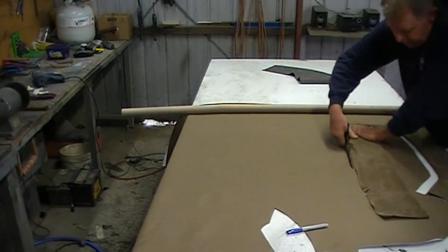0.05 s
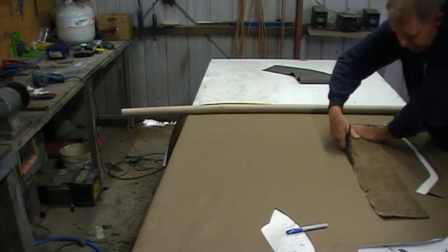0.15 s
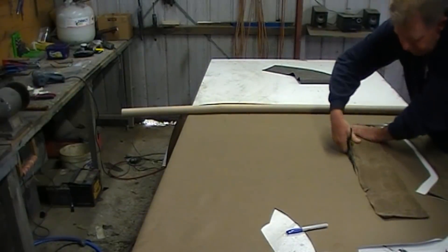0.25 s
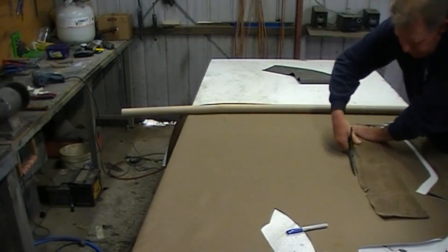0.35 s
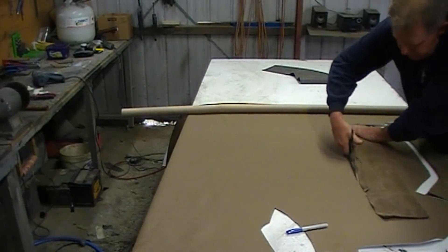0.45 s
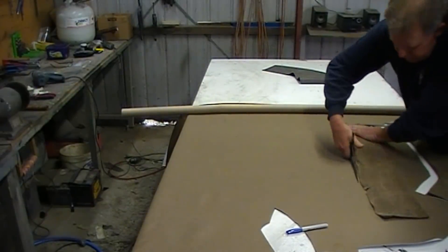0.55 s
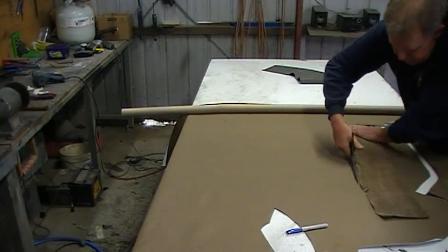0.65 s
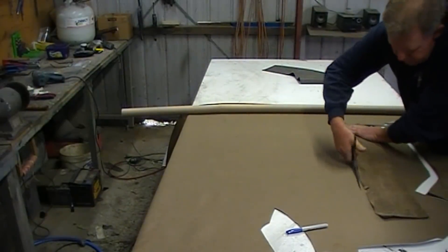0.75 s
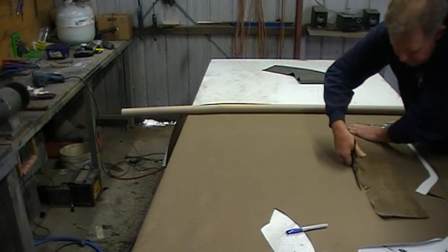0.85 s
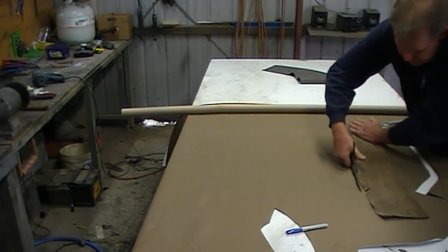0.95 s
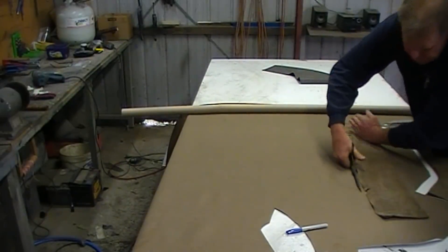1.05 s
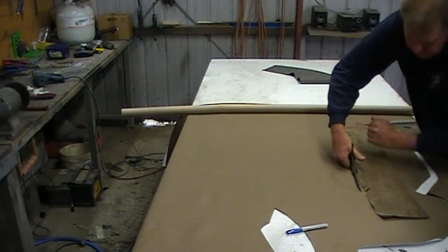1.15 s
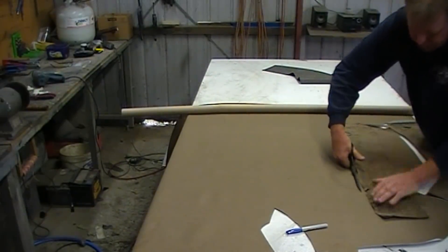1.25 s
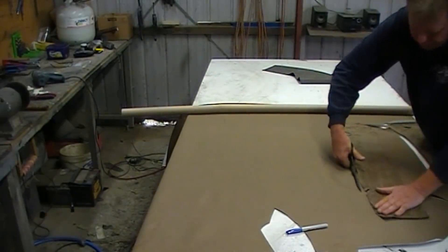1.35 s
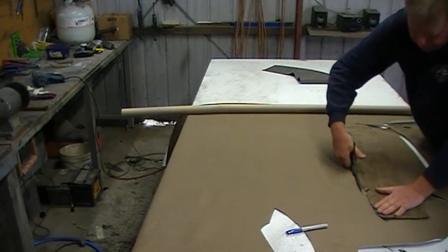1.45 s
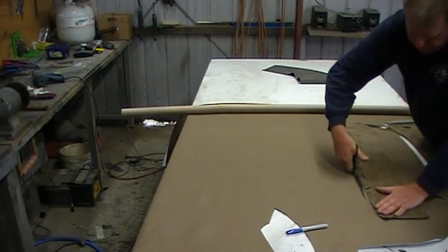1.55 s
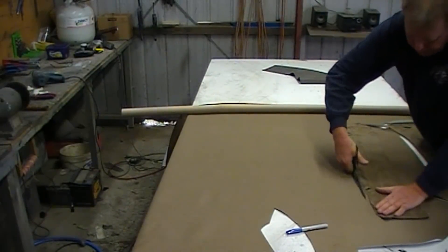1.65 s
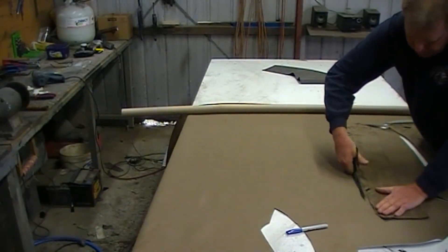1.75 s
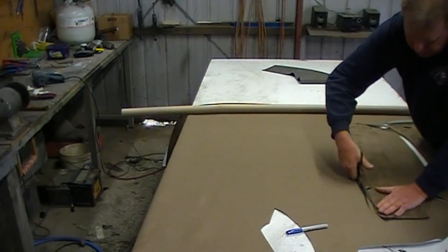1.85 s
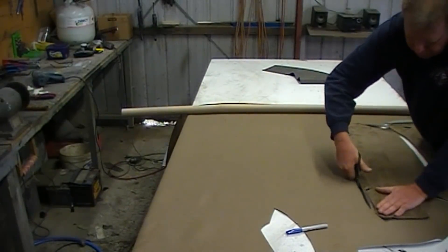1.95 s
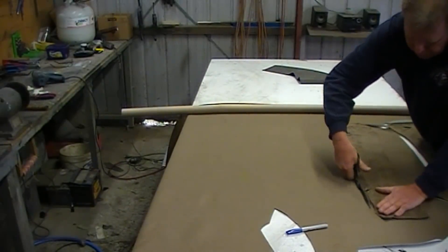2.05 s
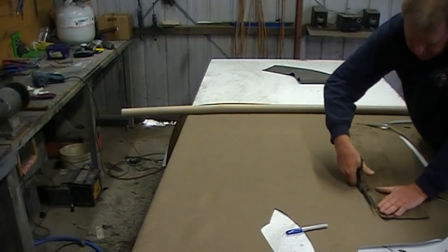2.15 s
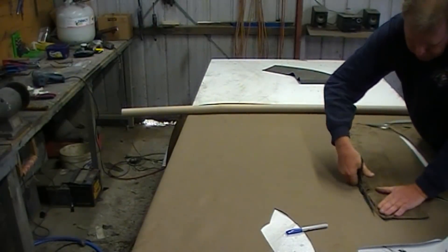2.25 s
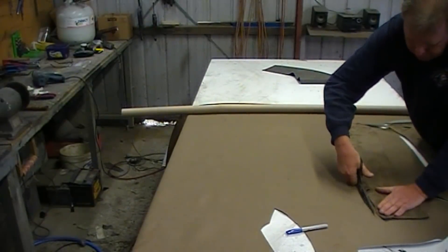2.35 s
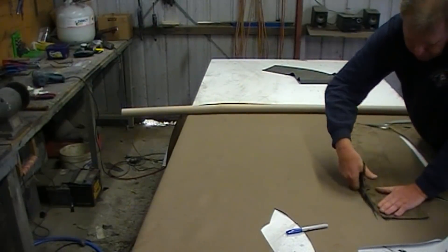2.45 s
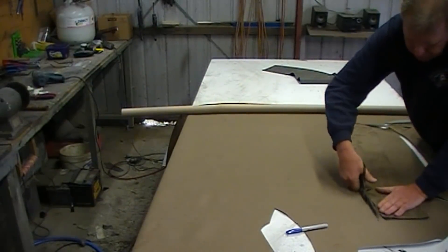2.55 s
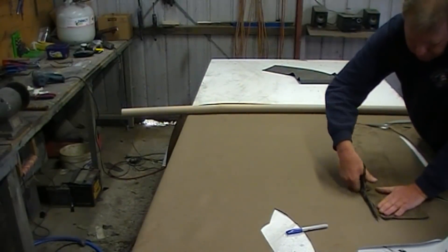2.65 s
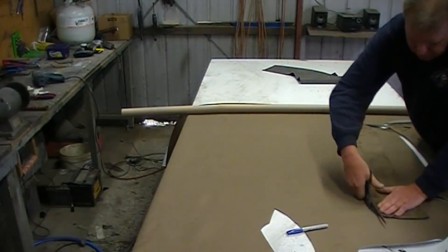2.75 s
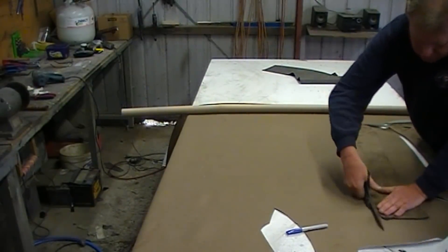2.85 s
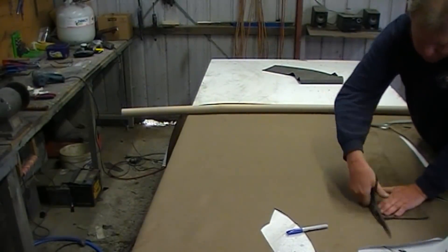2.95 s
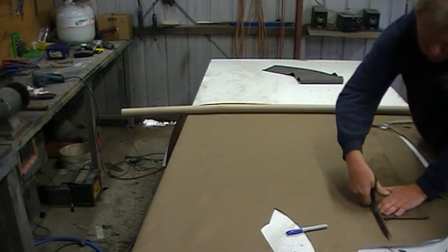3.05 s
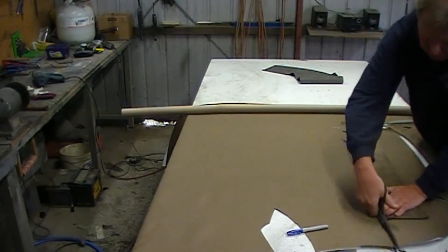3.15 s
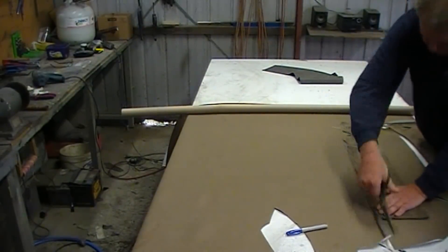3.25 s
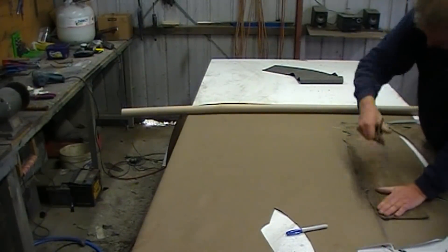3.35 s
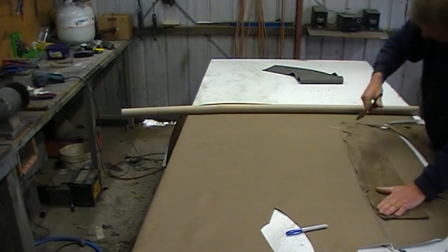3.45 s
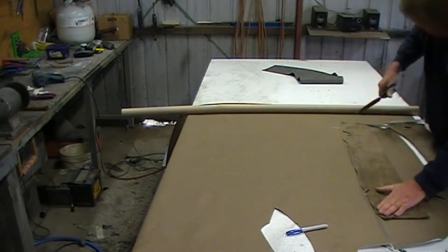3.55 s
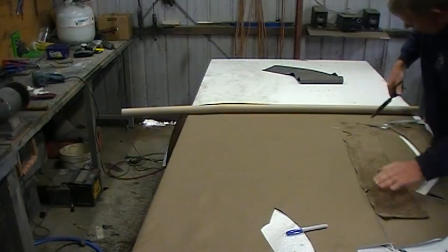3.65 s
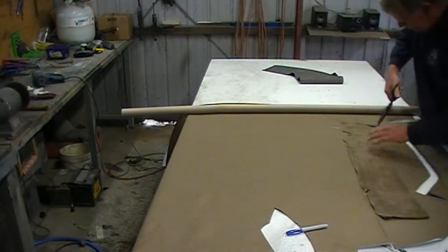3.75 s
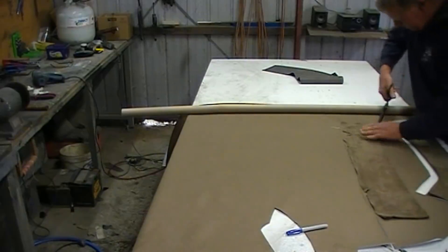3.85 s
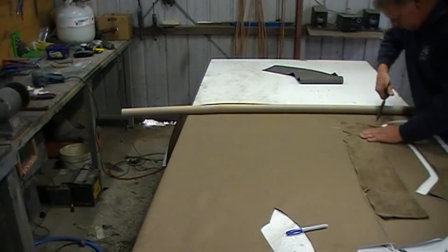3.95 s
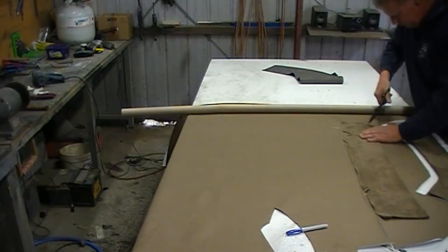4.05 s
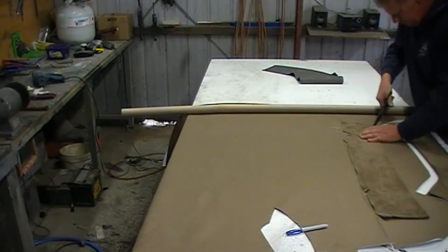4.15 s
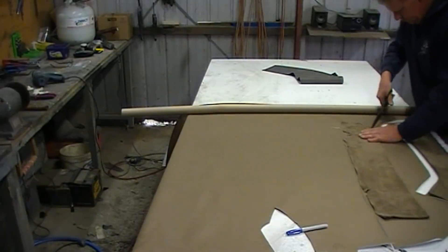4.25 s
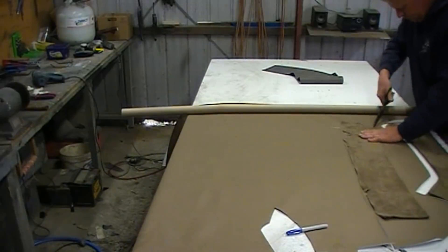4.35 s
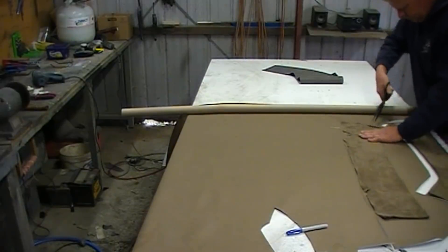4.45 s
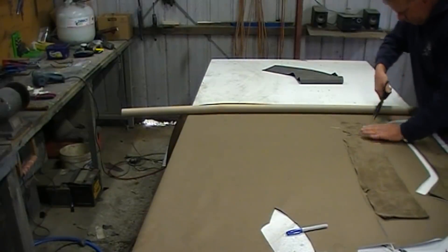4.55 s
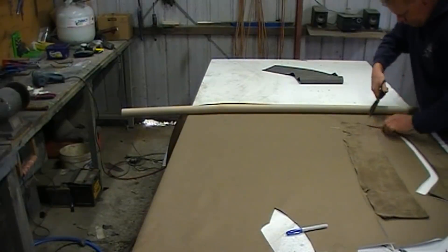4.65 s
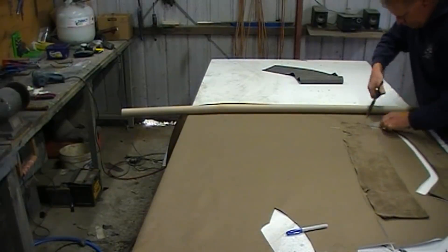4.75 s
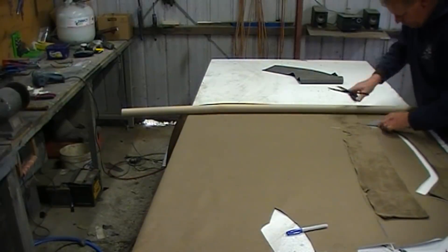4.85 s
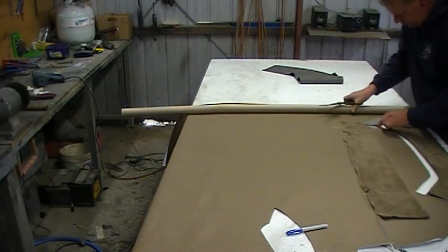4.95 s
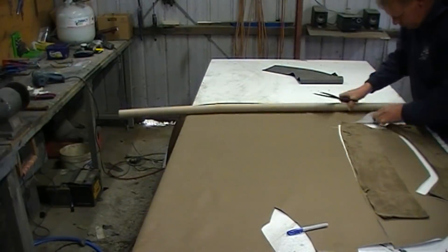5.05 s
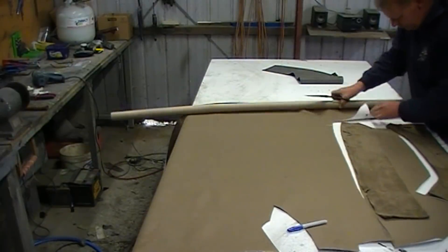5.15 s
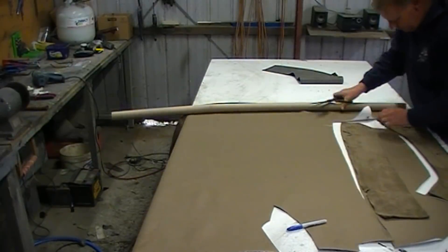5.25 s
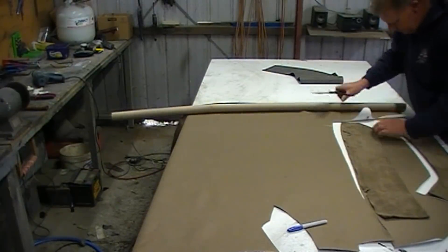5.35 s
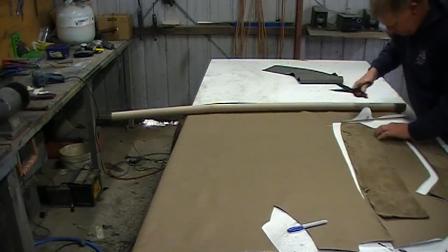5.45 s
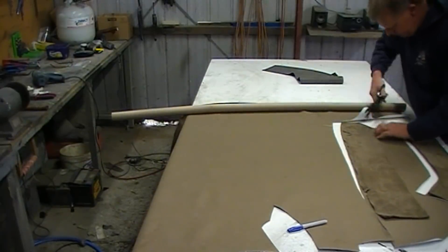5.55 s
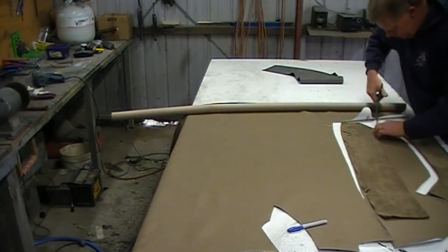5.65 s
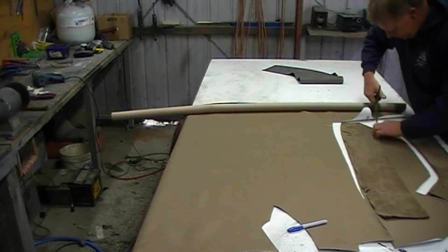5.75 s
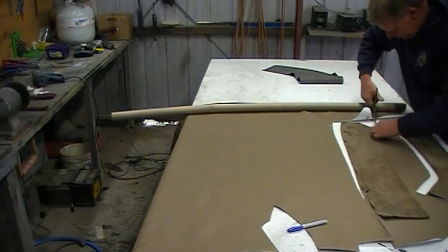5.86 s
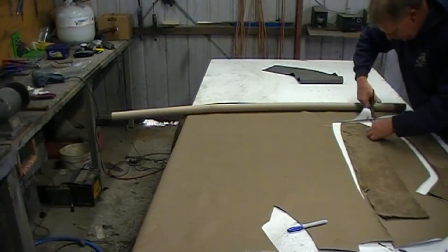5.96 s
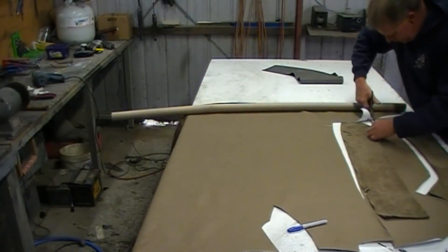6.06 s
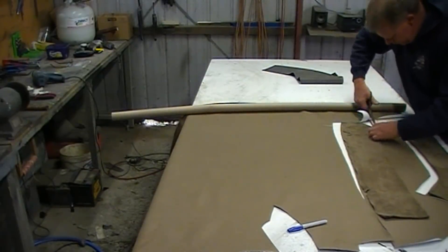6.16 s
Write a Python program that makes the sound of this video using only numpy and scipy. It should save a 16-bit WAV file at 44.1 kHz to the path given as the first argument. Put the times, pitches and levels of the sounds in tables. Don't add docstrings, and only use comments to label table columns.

```python
import sys
import numpy as np
from scipy import signal
from scipy.fft import rfft, irfft, next_fast_len
from scipy.io import wavfile
from scipy.ndimage import uniform_filter1d

SR = 44100
rng = np.random.default_rng(int(sys.argv[2]) if len(sys.argv) > 2 else 0)


def linear_from_db(decibels):
    return 10 ** (np.asarray(decibels, float) / 20)


def wrap_up_sound(samples):
    columns = np.atleast_2d(samples).T
    tamed = np.clip(columns, -1, 1)
    steps = np.round(tamed * 32767).astype(np.int16)
    wavfile.write(sys.argv[1], SR, steps)


N = 273861
TIME = np.arange(N) / SR
LIFT_S, FREE_S = 3.5, 3.275

# [t/s, length/s,
# level/dB, low modes/dB, brightness/dB per kHz]
BITES = [(0.08, 0.031, -20, -6, -5), (0.388, 0.019, -19, -6.5, 14), (0.675, 0.028, -27, -3, -9.5),
         (0.934, 0.023, -22, -2.5, 0), (0.956, 0.013, -13, -6, 2.5), (1.518, 0.01, -46.5, 11, -3),
         (1.741, 0.024, -19, -7.5, -5), (2.026, 0.022, -27.5, -4.5, -5), (2.044, 0.018, -19.5, -5, 2),
         (2.34, 0.023, -21.5, 0.5, -7), (2.364, 0.0121, -19, -10, -2), (2.643, 0.019, -19.5, -8, -2),
         (2.881, 0.014, -16.5, -4, 11), (3.06, 0.0287, -20, -3, -1.5), (3.2508, 0.0063, -22, -4.5, 15),
         (3.259, 0.015, -20, -4, 27)]
# [t/s, length/s, level/dB, low modes/dB, top modes/dB]
RUNOUTS = [
    (0.103, 0.0062, -22.5, 4, -6),
    (0.423, 0.01, -29, 0.5, -2),
    (0.699, 0.015, -31, 4.5, 10.5),
    (0.97, 0.014, -22.5, 4, -2),
    (1.773, 0.01, -25.5, 3.5, 13.5),
    (2.067, 0.0067, -24.5, -1.5, 8.5),
    (2.665, 0.0128, -18, 1, 7),
    (2.896, 0.014, -17, -3, 4),
    (3.08, 0.045, -24.5, -6, 2),
]
# [t/s, hold/s, level/dB, low modes/dB, cloth hiss level/dB]
SCRAPES = [(0.0, 0.0027, -41.5, 4, -48), (0.143, 0.039, -35.5, 3.5, -55), (0.241, 0.054, -45, -2.5, -58),
           (0.426, 0.017, -27, 9.5, -37), (0.566, 0.065, -46.5, 4.5, -58), (0.809, 0.054, -42, 5, -54.5),
           (1.03, 0.043, -47, 3, -52.5), (1.532, 0.094, -42, 2.5, -59), (1.83, 0.085, -37, -3, -56),
           (2.152, 0.066, -40.5, 4, -51), (2.424, .01, -41, -6, -72), (2.516, 0.051, -43, 1.5, -56.5),
           (2.745, 0.087, -37, -0.5, -54.5), (2.92, 0.056, -32, 4, -41.5), (3.154, 0.086, -38.5, 3, -54.5),
           (3.277, 0.052, -32.5, 2, -30)]
# [f/Hz, width/Hz, level/dB]
DRAG_MODES = [(814, 124, 0.5), (3020, 184, -10.5), (3450, 420, 0)]


def shears():
    push = linear_from_db(-66.5) * (TIME < LIFT_S)
    low_db = np.full(N, 3.0)
    for s, hold, db, low, _ in SCRAPES:
        drag = stroke(s, hold, db - 5, attack_s=0.083, release_s=0.28)
        low_db[drag > push] = low
        push = np.maximum(push, drag)
    ride = push
    push = push * linear_from_db(-5)
    top_db, bright_db, handle_db = np.full(N, 1.5), np.full(N, -2.0), np.full(N, -16.0)

    cuts = [(s, length, db, low, -4.5, bright) for s, length, db, low, bright in BITES]
    cuts += [(s, length, db, low, top, 2.5) for s, length, db, low, top in RUNOUTS]
    for s, length, db, low, top, bright in cuts:
        cut = slice(int(s * SR), int((s + length) * SR))
        push[cut] = linear_from_db(db - 5)
        low_db[cut] = low - 2
        top_db[cut] = top + 2.5
        bright_db[cut] = bright
        handle_db[cut] = 6.5

    clusters_db = 3 * np.tanh(walk(260)) + 2 * np.tanh(walk(2500))
    threads = unit(rng.standard_normal(N) * linear_from_db(clusters_db))
    sing = np.zeros(N)
    for hz, width, db in DRAG_MODES:
        gain = linear_from_db(db - 0.5 + low_db * (hz < 2000))
        sing += gain * mode(ring(ride * threads, hz, 2 * width), hz, width)
    force = np.roll(uniform_filter1d(push, size=130), shift=45) * threads
    held = [x[TIME < LIFT_S + .3] for x in (force, low_db, top_db, bright_db, handle_db)]
    add(sing, 0, blades(*held, scatter_db=3.5, edge_hz=3914, bottom_hz=441))
    return sing


# [f/Hz, width/Hz, level/dB]
BLADE_LOW = [(480, 360, -20.5), (623, 88, -20), (920, 230, -11), (1045, 310, 2), (1280, 180, -3),
             (1576, 170, -6), (1756, 110, -4), (1882, 90, -4)]
BLADE_MID = [(2415, 220, -5.5), (2625, 230, -12.5), (2870, 96, 0.5), (3115, 180, -8), (3157, 130, -1.5),
             (3410, 250, -6), (3600, 120, 0.5), (3756, 114, -7)]
BLADE_TOP = [(5300, 500, -19.5), (6440, 1000, -17), (6890, 340, -8), (7560, 320, -27), (9353, 1200, -16),
             (11200, 650, -15.5), (13500, 1200, -23), (15040, 760, -27.5)]


def blades(force, low_db, top_db, bright_db, handle_db, scatter_db, edge_hz, bottom_hz):
    def group(modes, group_db, slope_db, pivot_hz):
        out = 0
        for hz, width, db in modes:
            tilt_db = slope_db * (hz - pivot_hz) / 1e3
            scatter = scatter_db * walk(25)[:len(force)]
            out = out + mode(force * linear_from_db(db + group_db + tilt_db + scatter), hz, width)
        return out
    body = group(BLADE_LOW, low_db, handle_db, 1000) + group(BLADE_MID, 0, bright_db, 3300)
    inside = signal.butter(6, [bottom_hz, edge_hz], "bandpass", fs=SR, output="sos")
    above = signal.butter(4, edge_hz, "highpass", fs=SR, output="sos")
    return signal.sosfilt(inside, body) + signal.sosfilt(above, group(BLADE_TOP, top_db, 0, 0))


# [t/s, level/dB, f/Hz]
THREADS = [(0.0835, -14, 3600), (0.087, -11.5, 3660), (0.091, -17, 3570), (0.097, -13, 3290),
           (0.1018, -11, 3220.0), (0.1077, -15, 3080), (0.1145, -19, 3200), (0.1293, -37, 3240),
           (0.3917, -9, 3565), (0.3986, -17, 3600), (0.4066, -11, 3317), (0.4126, -19, 3450),
           (0.418, -12, 3600.0), (0.4253, -11.5, 3130), (0.699, -15, 3030), (0.703, -20, 2860),
           (0.716, -16, 3070), (0.9414, -25, 3350.0), (0.957, -17, 3200), (0.9648, -11, 3270),
           (0.9732, -14, 3480), (0.9846, -24, 3300), (1.7454, -14.5, 3470), (1.7522, -22, 3520),
           (1.7571, -21, 3385), (1.7767, -24, 2980), (2.0329, -24, 3220), (2.0493, -8.5, 3334),
           (2.0575, -9, 3313), (2.065, -6.5, 3300), (2.067, -10, 3405), (2.0769, -23, 3260),
           (2.0822, -26, 3270), (2.346, -18, 3375), (2.358, -15.5, 3140.0), (2.3694, -9.5, 3320),
           (2.3753, -16, 3310), (2.3803, -16.0, 3360), (2.3899, -26, 3280), (2.3985, -20, 3217),
           (2.6521, -22, 3690), (2.6576, -11, 3580), (2.6676, -9.5, 3214), (2.673, -17, 3300),
           (2.6842, -15.5, 3510.0), (2.8862, -20, 3490), (2.8905, -25, 3530), (2.8959, -21, 3520),
           (2.9005, -19, 3660), (2.9128, -19, 3700), (3.0652, -31, 3360), (3.0721, -16.0, 3360),
           (3.0794, -17, 3500), (3.0992, -14.5, 3360), (3.1084, -16, 3570), (3.2559, -8.5, 3370),
           (3.262, -18, 3590), (3.269, -22, 3380), (3.345, -17, 3720)]
# [t/s, level/dB, f/Hz]
LATE_THREADS = [(0.1207, -25.5, 3300), (0.1268, -24, 3140), (0.1317, -20.5, 3060), (0.1362, -27.5, 3520),
                (0.4342, -26, 3500), (0.4425, -27, 3310), (0.4512, -23.1, 3220), (0.4664, -27, 3130),
                (0.6832, -26, 3240), (0.6876, -31, 3100), (0.6935, -22.5, 3150), (0.7052, -24, 2900),
                (0.713, -20, 3070), (0.9924, -19, 3190), (0.9978, -32, 3370), (1.7601, -18, 3350),
                (1.7715, -25, 3500), (1.7847, -22.5, 3040), (2.0931, -25.5, 3270), (2.101, -25, 3410),
                (2.1085, -23, 3310), (2.6905, -34, 3126), (2.6976, -20, 3277), (2.9324, -22, 3480),
                (2.9414, -25, 3460), (2.9482, -18.5, 3720), (3.1203, -24, 3350), (3.1272, -26.5, 3210),
                (3.1421, -26, 3450)]


def pings():
    out, t = np.zeros(N), TIME[:900]
    shape = swell(t, peak_s=.003, rise_s=0.0011, fade_s=0.0025)
    rows = [*THREADS, *((s - .0012, db - 2.5, hz) for s, db, hz in LATE_THREADS)]
    chance = rng.random((len(rows), 4))
    for (s, db, hz), (a, b, c, d) in zip(rows, chance):
        tone = np.sin(2 * np.pi * (hz * t + a))
        tone += linear_from_db(-13.5) * np.sin(2 * np.pi * ((1100 + 800 * d) * t + b))
        tone += linear_from_db(-20.5) * np.sin(2 * np.pi * ((6800 + 500 * b) * t + c))
        tone += linear_from_db(-7.5) * np.sin(2 * np.pi * (hz + 700 * (c - .5)) * t)
        tick = np.cos(2 * np.pi * (6000 + 8000 * d) * (t - .002)) * bump(t, .002, .00015)
        add(out, s - .0018, linear_from_db(db - 4) * (tone * shape + linear_from_db(-21) * tick))
    return out


# [t/s, level/dB, f/Hz]
SLIPS = [(0.0951, -19, 1906), (0.0981, -18, 1044), (0.1083, -15.5, 1793), (0.1088, -19.5, 1010),
         (0.1155, -24, 1950), (0.1173, -20, 1064), (0.1232, -30, 1800), (0.1248, -17, 990),
         (0.144, -28, 1004), (0.4088, -17, 1067), (0.4306, -16, 1793), (0.4311, -19, 1084),
         (0.4447, -22, 1057), (0.4578, -23, 1710), (0.4639, -19, 1200), (0.6991, -23, 1923),
         (0.7054, -22, 1290), (0.7118, -14, 1878), (0.9506, -24, 1040), (0.9653, -19, 1768),
         (0.9711, -26, 1020), (0.9775, -25, 1795), (0.9792, -14, 988), (0.9869, -30, 986),
         (0.9997, -21, 1013), (1.0038, -25, 1840), (1.75, -16, 1806), (1.7567, -24, 1850),
         (1.7596, -20, 1010), (1.7763, -19, 1773), (1.7784, -26, 990), (1.7842, -23, 1750),
         (2.0536, -20, 1760), (2.0616, -20, 990), (2.0625, -17.5, 1550), (2.0702, -18, 1770),
         (2.3538, -23, 1680), (2.3619, -19.5, 890), (2.371, -18, 1540), (2.372, -27, 1066),
         (2.652, -20, 2030), (2.6685, -21, 1897), (2.6693, -18, 1140), (2.6756, -25, 1860),
         (2.6785, -18, 1044), (2.8829, -23, 1120), (2.8852, -15.5, 1723), (2.8934, -21, 1800),
         (2.896, -23, 1110), (2.9026, -21, 1675), (2.9063, -14.5, 1120), (3.0691, -24, 884),
         (3.0752, -16, 1633), (3.0778, -22, 1030), (3.0816, -15, 1670), (3.0865, -21, 985),
         (3.0952, -25, 966), (3.1066, -23, 1045), (3.1258, -22, 1000), (3.2722, -22, 1650)]
# [f/Hz, width/Hz, level/dB]
CHIME = [(2900, 90, -6), (3600, 90, -3), (10050, 120, 0), (11500, 120, -5)]


def slips():
    out, t = np.zeros(N), TIME[:1300]
    shape = swell(t, peak_s=.005, rise_s=0.0024, fade_s=0.0017)
    for (s, db, hz), phase in zip(SLIPS, rng.random(len(SLIPS))):
        add(out, s - .005, linear_from_db(db - 3) * np.sin(2 * np.pi * (hz * t + phase)) * shape)
    for hz, width, db in CHIME:
        add(out, 3.9585, linear_from_db(db - 39) * np.sin(2 * np.pi * hz * t) * np.exp(-np.pi * width * t))
    return out


# [t/s, level/dB]
TICKS = [(0.1146, -11), (0.4294, -6), (0.7018, -29), (0.9777, -11), (1.7784, -11), (2.0587, -26),
         (2.3705, -32), (2.6668, -24), (2.6778, -10), (2.9053, -7), (3.0819, -9), (3.2716, -3.5),
         (3.9579, -27)]
# [t/s, jolt level/dB, after-rattle level/dB]
SNAPS = [(0.114, -5, -37), (.429, -1.5, -23), (0.7, -24, -36), (0.9777, -7, -32), (1.779, -10, -34.5),
         (2.059, -9, -38.5), (2.372, -32, -56), (2.6653, -12, -35), (2.679, -7, -40), (2.9079, -29, -36.5),
         (3.083, -16.5, -42), (3.2712, -13, -38), (3.959, -34, -55)]


def snaps():
    out, t = np.zeros(N), TIME[:5000]
    for (s, db), (jolt_s, jolt_db, rattle_db) in zip(TICKS, SNAPS):
        noise = rng.standard_normal((2, len(t)))
        tick = np.cos(2 * np.pi * 14200 * t) * bump(t, .0015, .00012)
        tick += .3 * ring(noise[0], 12000, 12000) * bump(t, .0014, .0003)
        add(out, s, linear_from_db(db + 3.5) * tick / np.abs(tick).max())

        jolt = np.sin(2 * np.pi * 1700 * (t - .0014)) * bump(t, .0014, .00019)
        edge = (t - .0014) / .00004
        jolt -= edge * np.exp(-edge ** 2)
        rattle = ring(noise[1], 8600, 10600) * np.exp(-t / 0.025) * (1 - bump(t, 0, .0018))
        add(out, jolt_s, linear_from_db(jolt_db) * jolt + linear_from_db(rattle_db) * rattle)
    return out


# [t/s, level/dB, f/Hz, tick level/dB]
KNOCKS = [(0.071, -21, 854, -4.5), (0.361, -23.5, 814, -5), (.365, -29.5, 864, -30),
          (0.661, -21.5, 787, -10), (.674, -31, 801, -25), (0.931, -34, 835, -9), (2.981, -36, 870, -20),
          (2.993, -34.5, 1080, -20), (1.7288, -19.5, 784, -4.5), (1.7322, -26, 860, -24),
          (2.014, -30.5, 876, -8), (2.87, -20.5, 850, -3), (2.8732, -28, 780, -16.5),
          (3.05, -20.5, 867, -5), (3.0535, -19.5, 840, -21), (3.243, -26, 860, -27),
          (3.246, -29.5, 897, -27), (5.8300, -18, 657, -22)]
# [t/s, level/dB, f/Hz, tick level/dB]
PATS = [
    (3.9595, -37.5, 323, -8),
    (3.964, -28, 528, -14),
    (4.264, -35, 522, -14),
    (4.454, -35, 534, -22.5),
    (5.102, -45.5, 467, -17),
    (5.348, -45, 441, -20),
]
# [t/s, level/dB, f/Hz, tick level/dB]
NUDGES = [(3.272, -34.5, 480, -30), (3.98, -48, 405, -25), (4.275, -55, 406, -22), (4.466, -51.5, 403, -22),
          (3.30, -36.5, 570, -30), (3.335, -43, 475, -28), (3.37, -55, 412, -35), (3.41, -53.5, 480, -46),
          (5.117, -46.5, 453, -27), (5.357, -49.5, 300, -22), (5.374, -54, 273, -25)]


def blows(table, rise_s, hold_s, thump_hz, thump_db, tick_s):
    out, t = np.zeros(N), TIME[:1500]
    swing = (1 - np.exp(-t / rise_s)) * np.exp(-(t / hold_s) ** 4)
    for s, db, hz, tick_db in table:
        top = np.sin(2 * np.pi * hz * t) + linear_from_db(thump_db) * np.sin(2 * np.pi * thump_hz * t)
        top += linear_from_db(-8.5) * (np.sin(2 * np.pi * 1.327 * hz * t) - np.sin(2 * np.pi * 0.727 * hz * t))
        grit = rng.standard_normal(len(t)) * (np.exp(-t / tick_s) + 0.27 * np.exp(-t / 0.017))
        tick = ring(ring(grit, 3100, 1970), 3100, 1970)
        add(out, s - rise_s / 2, linear_from_db(db) * (top * swing + linear_from_db(tick_db) * tick / np.abs(tick).max()))
    return out


# [t/s, level/dB, wall modes/dB, hardness/dB]
DROPS = [(5.8237, -22.5, -1.5, 9), (5.831, -18, -8.5, 1.5), (5.843, -36, -18, -5), (5.861, -32, -17, 4),
         (5.879, -18, -18, -9), (5.899, -19, -13, -8), (5.912, -28.5, -19, 4.5), (5.924, -24, -14, -1),
         (5.939, -26, -29, -5), (5.952, -23, -19, -11), (5.968, -29, -22, -18), (5.994, -24, -24.5, -23),
         (6.024, -40, -21, -31), (6.089, -36, -30, -21)]
# [f/Hz, width/Hz, level/dB]
ROLL_LOW = [(296, 50, -13.5), (432, 120, -14), (575, 108, -1.5), (634, 97, -2.5), (738, 120, -13)]
ROLL_MID = [(890, 240, 9), (1110, 220, 7), (1350, 150, -4)]
ROLL_TOP = [(2750, 270, -6), (3140, 810, -7), (3600, 700, -14), (6700, 870, -15), (11800, 1200, -19)]


def roll():
    forces, t = np.zeros((3, N)), TIME[:1500]
    for s, db, wall_db, hard_db in DROPS:
        crumple = np.exp(-t / 0.0051) * (1 - np.exp(-t / 0.0014))
        contact = rng.standard_normal(len(t)) * crumple * linear_from_db(db)
        for force, share_db in zip(forces, (0, wall_db, hard_db)):
            add(force, s, contact * linear_from_db(share_db))
        add(forces[0], s + .001, linear_from_db(db - 14) * np.hanning(24))
    crack_s = 5.8242
    out = linear_from_db(-12) * np.sin(2 * np.pi * 3000 * (TIME - crack_s)) * bump(TIME, crack_s, .00035)
    for force, modes in zip(forces, (ROLL_LOW, ROLL_MID, ROLL_TOP)):
        for hz, width, db in modes:
            out += linear_from_db(db) * mode(ring(force, hz, 3 * width), hz, width)
    return out


# [f/Hz, level/dB per Hz]
CLOTH = [(1180, -43.5), (2000, -16), (2620, -13.5), (3770, -1.5), (5630, -0.5), (6590, -1.5), (13400, -1.5),
         (16000, -1.5)]
BRUSHES = [(3.465, 0.05, -80, -2, 1.8), (3.618, 0.19, -78.5, 4, 1.5), (3.967, .004, -56, 1, 0.33),
           (4.049, 0.018, -44.5, -13.5, 0.08), (4.522, .01, -67.5, -11, 2.1),
           (4.956, 0.0125, -71, -12, -0.5), (5.06, 0.045, -65, 6.5, 0.08), (5.166, 0.077, -58, 3, 0.08),
           (5.327, 0.034, -76, -2, 2), (5.277, 0.096, -74.5, -4, 1), (5.824, 0.0244, -47, 1, -0.84),
           (5.893, 0.033, -61.5, 9, -0.7), (6.118, 0.0088, -76, 1.5, 4.5)]
# [t/s, hold/s, level/dB, f/Hz]
SLEEVE = [
    (3.84, 0.027, -69.5, 8310),
    (4.421, 0.25, -73.5, 9650),
    (4.52, .02, -68, 14000),
    (5.682, 0.31, -74.5, 9300),
    (5.925, .015, -65, 13730),
]
# [f/Hz, width/Hz, level/dB]
FREE_BLADE = [(3720, 150, 0), (4210, 120, -6), (5000, 800, -11.5), (6900, 530, -8), (8150, 700, -10),
              (13000, 1200, -7)]


def cloth():
    grains = rng.standard_normal((2, N)) * linear_from_db(2.6 * walk(40) + 1.82 * walk(900))
    bright = unit(colour(grains[0], CLOTH))
    dull = unit(ring(grains[1], 1370, 2200))

    under_blade = linear_from_db(-72) * (TIME < LIFT_S)
    for s, hold, _, _, hiss_db in SCRAPES:
        under_blade += stroke(s, hold, hiss_db - 3, attack_s=0.13, release_s=0.28)
    under_hand = linear_from_db(-78.5) * (TIME >= LIFT_S)
    heavy = under_hand * linear_from_db(-22)
    for s, hold, db, dull_db, attack_s in BRUSHES:
        brush = stroke(s, hold, db, attack_s, release_s=0.27)
        under_hand += brush
        heavy += linear_from_db(dull_db) * brush

    steel = sum(linear_from_db(db) * unit(ring(grains[1], hz, width)) for hz, width, db in FREE_BLADE)
    blade = np.where(TIME > FREE_S, steel + linear_from_db(-4) * bright, bright)
    sleeve = np.zeros(N)
    for s, hold, db, hz in SLEEVE:
        whisper = unit(ring(ring(grains[1], hz, 2200), hz, 2200))
        sleeve += stroke(s, hold, db, attack_s=0.13, release_s=0.13) * whisper
    return under_blade * blade + under_hand * bright + heavy * dull + sleeve


# [t/s, level/dB]
BUMPS = [
    (0.429, -77),
    (2.019, -74),
    (2.879, -77),
    (3.069, -59.5),
    (3.27, -56),
    (3.959, -77),
]


def stand():
    out, t = np.zeros(N), TIME[:4000]
    for s, db in BUMPS:
        add(out, s, linear_from_db(db + 5) * np.sin(2 * np.pi * 32 * t) * np.exp(-t / .02))
    return out


# [f/Hz, T60/s]
WALLS_T60 = [(200, 0.29), (1000, 0.28), (4000, 0.25), (14000, 0.27)]
# [f/Hz, level/dB]
WALLS_DB = [(200, -2.5), (600, -3), (1200, -3), (4000, -7), (14000, -5.5)]
# [f/Hz, side minus mid level/dB]
WALLS_SIDE = [(200, -29), (1000, -19), (4000, -12), (14000, -7)]
# [t/s, level/dB]
ECHOES = [
    (.0068, -9),
    (0.014, -12.5),
    (.023, -13),
    (0.031, -17),
]


def walls():
    t = TIME[:int(.6 * SR)]
    haze = np.zeros((2, len(t)))
    for hz in 100 * 2 ** np.arange(0, 7.6, .5):
        band = ring(rng.standard_normal(haze.shape), hz, hz / 3)
        band[1] *= linear_from_db(curve(WALLS_SIDE, hz))
        t60 = curve(WALLS_T60, hz)
        haze += band * linear_from_db(curve(WALLS_DB, hz) - 60 * t / t60) * np.sqrt(20 / t60 / SR)
    haze *= 1 - np.exp(-t / 0.00075)
    echoes = np.zeros(haze.shape)
    for s, db in ECHOES:
        echoes[:, int(s * SR)] = linear_from_db(db) * np.array([1, 0.25 * rng.standard_normal()])
    haze += signal.sosfilt(signal.butter(1, 4000, fs=SR, output="sos"), echoes)
    haze[0, 0] += 1
    return haze


# [f/Hz, level/dB per Hz]
SHED = [(15, -42), (40, -36), (114, -14.5), (500, -15), (1160, -19), (1700, -15.5), (2350, -19),
        (10100, -43.5)]
# [f/Hz, side minus mid level/dB]
SHED_SIDE = [(30, 0.5), (125, -10), (500, 0.5), (2000, -4), (8000, 3)]
# [t/s, level/dB]
SHED_LEVEL = [(0, 3), (1.3, 1.5), (3.6, 0), (4.8, -2), (6.21, -1)]
# [f/Hz, width/Hz, level/dB]
HUM = [(153.4, 34, -3), (300, 61, -4.5)]
# [t/s, level/dB]
HUM_LEVEL = [(0, -58.5), (1.0, -58), (1.7, -58), (3.5, -63.5), (4.7, -59.5), (5.2, -59.5), (5.5, -60),
             (6.21, -66.5)]


def shed():
    out, gusts = 0, walk(0.42)
    for hz in 30 * 2 ** np.arange(0, 9.2, .5):
        band = ring(rng.standard_normal((2, N)), hz, hz / 3)
        out = out + band * linear_from_db(.5 * gusts + 1.7 * walk(8))
    mid = colour(out[0], SHED)
    side = colour(colour(out[1], SHED), SHED_SIDE)
    air_db = -55.5 + np.interp(TIME, *np.transpose(SHED_LEVEL))
    air = np.array([mid, side]) * linear_from_db(air_db) / np.sqrt(np.mean(mid ** 2))
    noise = rng.standard_normal((2, N))
    hum = sum(linear_from_db(db) * unit(ring(ring(noise, hz, width), hz, width)) for hz, width, db in HUM)
    mid_side_db = np.array([[0], [-14]])
    return air + hum * linear_from_db(np.interp(TIME, *np.transpose(HUM_LEVEL)) + mid_side_db)


def curve(table, hz):
    points = np.array(table)
    return np.interp(np.log(np.maximum(hz, 1)), np.log(points[:, 0]), points[:, 1])


def colour(x, table):
    size = next_fast_len(len(x), real=True)
    gain = linear_from_db(curve(table, np.fft.rfftfreq(size, 1 / SR)))
    return irfft(rfft(x, size) * gain, size)[:len(x)]


def unit(x):
    return x / np.sqrt(np.mean(x ** 2))


def ring(x, hz, width):
    return signal.lfilter(*signal.iirpeak(hz, hz / width, fs=SR), x)


def mode(x, hz, width):
    return ring(x, hz, width) * np.sqrt(SR / width / 20)


def bump(t, centre_s, width_s):
    return np.exp(-((t - centre_s) / width_s) ** 2)


def swell(t, peak_s, rise_s, fade_s):
    return np.exp(-(np.minimum(t - peak_s, 0) / rise_s) ** 2 - np.maximum(t - peak_s, 0) / fade_s)


def stroke(s, hold_s, db, attack_s, release_s):
    gain = np.zeros(N)
    span = slice(max(int((s - attack_s) * SR), 0), int((s + hold_s + release_s) * SR))
    t = TIME[span]
    away = np.maximum((s - t) / attack_s, (t - s - hold_s) / release_s)
    gain[span] = linear_from_db(db - 60 * np.maximum(away, 0))
    return gain


def walk(rate):
    step = 16 if rate < 100 else 1
    k = max(int(SR / rate / step), 2)
    levels = np.repeat(rng.standard_normal(N // step // k + 2), k)
    slewed = uniform_filter1d(uniform_filter1d(levels, k), k)
    return np.repeat(unit(slewed), step)[:N]


def add(out, s, x):
    i = int(s * SR)
    out[i:i + len(x)] += x[:len(out) - i]


# [f/Hz, level/dB]
LEAN = [(60, -29.5), (300, -24), (1200, -21), (3000, -43.5)]


def scene():
    knocks = blows(KNOCKS, rise_s=0.00083, hold_s=0.0045, thump_hz=362, thump_db=-13.0, tick_s=0.00076)
    pats = blows(PATS, rise_s=0.0043, hold_s=0.009, thump_hz=269.0, thump_db=-3.5, tick_s=0.004)
    cutting = shears() + pings() + slips() + snaps()
    table = cutting + knocks + linear_from_db(-3.0) * pats + roll() + cloth()
    mid, side = signal.fftconvolve(table[None], walls(), axes=1)[:, :N] + shed()
    nudges = blows(NUDGES, rise_s=0.0027, hold_s=0.027, thump_hz=237, thump_db=-3.5, tick_s=.003)
    mid = mid + linear_from_db(-4.5) * pats + nudges
    side = side - colour(mid, LEAN)
    return np.array([mid + side, mid - side]) + stand()


# [t/s, depth/dB]
CLAMPS = [
    (0.1181, 2.5),
    (0.4321, 3.5),
    (2.372, -2),
    (2.673, 3.5),
    (2.9068, 3.5),
    (3.083, -0.5),
    (3.273, 9),
]


def limiter():
    down_db, t = np.zeros(N), TIME[:20000]
    for s, db in CLAMPS:
        add(down_db, s, db * (1 - np.exp(-t / 0.00026)) * np.exp(-t / 0.04))
    return linear_from_db(-down_db)


def band_limit(x):
    return signal.sosfilt(signal.butter(12, 17150, fs=SR, output="sos"), x)


def record(dry):
    rounded = 1.3 * np.tanh(dry * limiter() / 1.3)
    thin = signal.sosfilt(signal.butter(1, 20, "highpass", fs=SR, output="sos"), rounded)
    cut = signal.sosfilt(signal.ellip(10, .2, 45, 15800, fs=SR, output="sos"), thin)
    top = signal.sosfilt(signal.ellip(10, .2, 60, 15900, "highpass", fs=SR, output="sos"), thin)
    sharp = uniform_filter1d(top ** 2, size=200) > linear_from_db(-76)
    return band_limit(cut + top * sharp)


dry = scene()
out = record(dry)
wrap_up_sound(out)
```